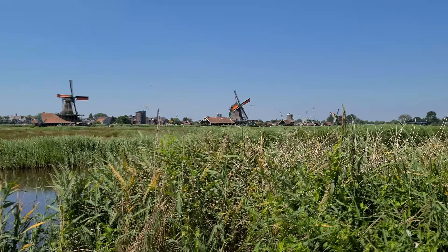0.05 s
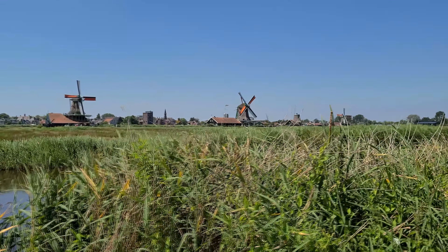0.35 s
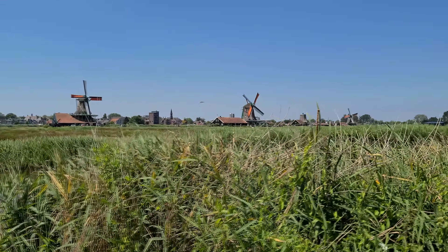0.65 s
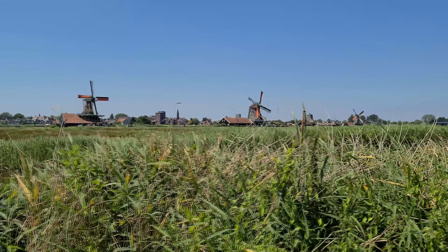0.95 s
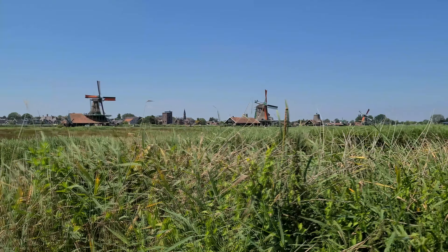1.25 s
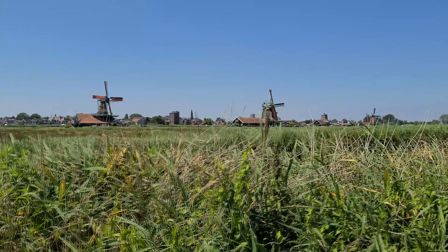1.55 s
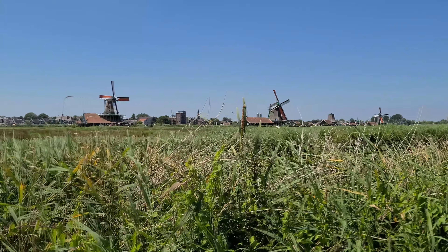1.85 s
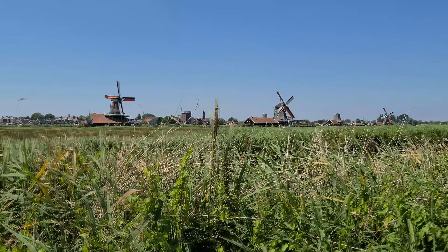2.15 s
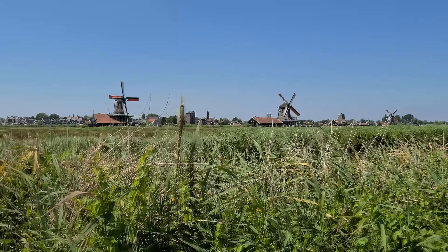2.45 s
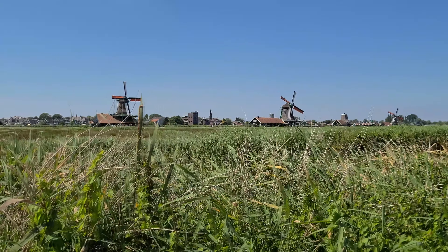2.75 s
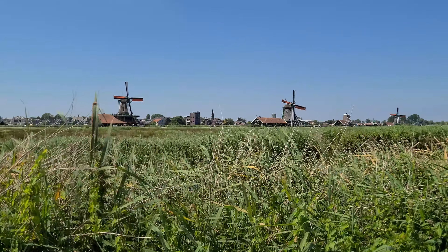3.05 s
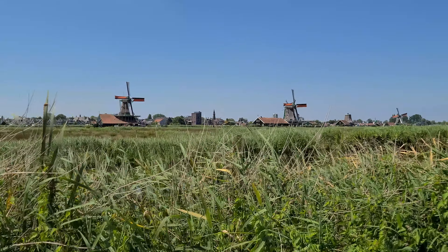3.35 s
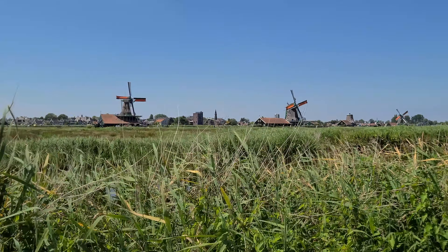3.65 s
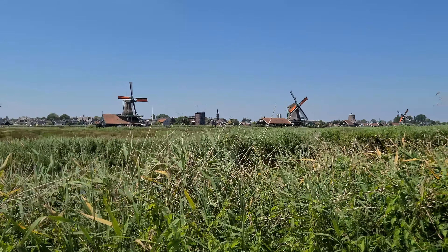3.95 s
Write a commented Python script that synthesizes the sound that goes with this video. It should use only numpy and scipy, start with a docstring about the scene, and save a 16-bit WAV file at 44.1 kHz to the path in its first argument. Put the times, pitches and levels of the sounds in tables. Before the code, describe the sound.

Wind rumbles and thumps on the microphone throughout, strongest at the start and near 1 and 2 seconds. Grass hisses softly underneath, and close reeds rustle, with small stalk snaps around 0.4, 1 to 1.3, 2.5 and 3.2 seconds. A distant bird repeats a faint whistle about four times a second with short gaps. A quiet songbird warbles on the right near 0.7, 1.3 and 2 seconds.

```python
"""Gusts rumble and thump on the microphone in a breezy reed meadow, over a soft, wide hiss of grass.
Close by, reeds swish, leaves brush, and stalks rub and snap: all grainy noise and short pulses.
Far off to the left, a wading bird repeats an arched whistle about four times a second, and a small
songbird on the right answers with warbled notes. Faint yelps of water birds and the blurred
whistles of a flock sit at the back, in the weak echo of open land."""
import sys
import numpy as np
from scipy import signal
from scipy.fft import rfft, irfft
from scipy.io import wavfile
from scipy.ndimage import uniform_filter1d, map_coordinates

SR = 44100
rng = np.random.default_rng(int(sys.argv[2]) if len(sys.argv) > 2 else 0)


def wav_out(sig):
    """Save sig, one row per channel (or a flat mono array), as 16-bit PCM at SR to the path in sys.argv[1]."""
    wavfile.write(sys.argv[1], SR, np.round(np.clip(np.atleast_2d(sig).T, -1, 1) * 32767).astype(np.int16))


N = 176400
T = np.arange(N) / SR

# gust envelopes, before the trim (time [s], rumble [dB], buffeting [dB], flutter [dB])
GUSTS = [(0.0, -32.5, -30, -45), (0.02, -45.5, -33.5, -47), (0.27, -39, -47, -66.5), (0.3, -53.5, -53, -64),
         (0.39, -44.5, -52, -68), (0.75, -47.5, -48.5, -60), (0.99, -42.5, -39, -57),
         (1.1, -46, -53, -54.5), (1.17, -50, -42.5, -67.5), (1.26, -42, -43.5, -54.5),
         (1.43, -41, -42, -53), (1.76, -40, -42, -61), (1.82, -43.5, -51.5, -60), (1.95, -35.5, -44.5, -69),
         (2.03, -40.5, -45.5, -62.5), (2.56, -42, -50.5, -68.5), (2.95, -47.5, -51, -66.5),
         (3.05, -45, -47, -67), (3.11, -42, -49, -57.5), (3.14, -42.5, -46, -61), (3.61, -47.5, -51, -70.5),
         (3.68, -43, -53, -73), (3.71, -47, -56, -63.5), (4.0, -46, -53.5, -70)]
# tone of the low, middle and upper wind layers (frequency [Hz], relative level [dB])
RUMBLE_EQ = [(12,-35),(24,-8.5),(40,1),(58,3.5),(85,2.5),(110,-6),(150,-23),(260,-62.5)]
BUFFET_EQ = [(65,-31),(105,-7),(130,-0.5),(165,-1),(205,-7.5),(260,-15.5),(340,-32.5),(600,-67.5)]
FLUTTER_EQ = [(170,-15),(250,-2.5),(310,0.5),(450,-5),(600,-11.5),(900,-29),(1600,-35),(4000,-53)]
# eddies thumping the microphone (time [s], pitch [Hz], half width [s], peak [dB])
EDDY_THUMPS = [(0.039,180.7,0.031,-29),(0.153,115.7,0.013,-25),(0.387,42.17,0.057,-35.5),(0.503,62.3,0.022,-33.5),(0.646,54.6,0.014,-32.5),(0.983,154.2,0.0071,-24),(1.036,215.2,0.018,-35.5),(1.135,37.95,0.032,-32.5),(1.371,98.6,0.01,-29),(1.745,133.6,0.012,-27),(1.959,76.2,0.0084,-23),(2.317,88,0.014,-30),(2.535,57.56,0.024,-30.5),(2.791,42.4,0.034,-39),(3.102,156.3,0.021,-33),(3.67,66,0.014,-28.5)]

# stalks snapping (time [s], snap peak [dB], centre [Hz], crunch [dB], crunch decay [s], L-R [dB])
STALK_SNAPS = [(0.352,-46,1390,-55,0.005,-1),(1.039,-41,1190,-50.5,0.025,-4),(1.0725,-49,2180,-57,0.014,-5),(1.2349,-43,1830,-50.5,0.0066,2),(1.263,-57,890,-55.5,0.016,-9),(2.206,-54,2100,-58,0.0066,20),(2.4806,-52,1090,-51,0.0049,-4),(2.5553,-44.5,2600,-64,.002,2),(2.6023,-50,2100,-53,.003,-5),(2.642,-59,900,-62,.003,2),(3.133,-50,1300,-57,.003,2),(3.1998,-48,2570,-62,.002,-2),(3.76,-53,1290,-57,.004,-2)]
# tone of a crunching or rubbing stalk (frequency [multiple of the centre], relative level [dB])
STALK_EQ = [(.2,6),(.55,3.5),(1,4),(1.6,-0.5),(2.6,-23),(6,-26)]
# stalks rubbing (time [s], half width [s], level [dB], centre [Hz], L-R [dB])
STALK_RUBS = [(0.38,.028,-59,1340,0),(0.528,0.023,-59.5,1260,2),(0.818,0.05,-64,980,-7),(1.509,0.017,-59.5,1230,-1),(1.665,0.011,-63.5,1400,2),(1.787,0.025,-58.5,1400,-1),(3.395,.012,-59,1620,-5),(3.927,0.0076,-60.5,1700,1)]

# wader calls (time [s], length [s], gain of the rise [dB], of the top [dB], of the fall [dB])
WADER_CALLS = [(0.085,0.14,-59,-69,-58.5),(0.332,0.14,-60.5,-66,-61),(0.574,0.12,-57.5,-72,-61),(.797,0.17,-58,-62.5,-60.5),(1.29,.13,-70,-83,-81),(1.521,0.13,-58.5,-80,-65),(1.776,0.12,-72,-73,-71),(2.012,.125,-68,-77,-75),(2.252,0.14,-64,-69,-61.5),(2.504,0.12,-60,-82,-66),(2.94,.135,-59,-79,-65),(3.175,0.17,-65,-72,-67),(3.41,0.14,-65,-68,-61.5),(3.658,.138,-57,-69,-62),(3.906,0.12,-62,-70,-68)]
# contour of one call (position [share of its length], pitch [Hz], relative level [dB])
CALL_ARCH = [(0,2642,-10),(.05,2851,0.5),(.11,3193,4.5),(.17,3414,-2.5),(.21,3776,-3),(.27,3970,-2),(.38,3920,-5.5),(.49,3692,-5),(.53,3410,-10),(.58,3170,2),(.65,2988,6.5),(.71,2816,0.5),(.8,2636,-2.5),(.94,2516,-5.5),(1,2430,-13)]
# songbird notes (time [s], length [s], start pitch [Hz], end pitch [Hz], flick rate [1/s],
# flick height before it shrinks [Hz], level [dB])
SONG_NOTES = [(.657,.08,4750,4880,46,400,-72),(.755,0.071,4040,3920,115,300,-75),(1.284,.013,4550,4500,44,100,-72),(1.299,0.1,4660,4970,45,750,-62.5),(1.405,0.037,4030,3990,150,556,-65),(1.443,0.048,3860,3890,120,120,-69),(2.005,0.098,4760,4920,44,405,-75),(2.091,0.097,4020,3900,116,300,-71.5)]

# swish envelope of the near reeds, before the trim (time [s], level [dB])
REED_SWELLS = [(0.0, -79), (0.01, -72.5), (0.42, -73), (0.49, -73), (0.56, -75.5), (0.7, -72.5),
               (0.89, -78.5), (1.2, -70), (1.41, -84.5), (1.83, -72.5), (1.95, -76.5), (2.34, -72),
               (3.03, -75), (3.05, -67), (3.16, -79), (3.2, -69), (3.23, -76), (3.39, -76), (3.43, -71),
               (3.72, -73.5), (3.91, -71), (4.0, -75.5)]
# leaves brushing (time [s], half width [s], level [dB], L-R [dB])
LEAF_BRUSHES = [(0.482,.018,-69.5,1),(.675,0.017,-72,0),(1.172,0.053,-69,-6),(1.701,0.0069,-70,0),(3.06,0.016,-71,4),(3.188,0.005,-62.5,3),(3.2,.0004,-50,-3),(3.209,0.007,-66,0),(3.487,.007,-67,9),(3.845,0.027,-72,-7),(3.918,0.0017,-62,-10)]
# tone of reeds, leaves, distant grass and dry stems (frequency [Hz], relative level [dB])
REED_EQ = [(1500,-23),(3500,-22),(6000,8.5),(7200,7),(7900,-3),(9300,3),(10500,0.5),(12000,4.5),(14000,-0.5),(16000,-1.5)]
LEAF_EQ = [(3000,-7),(6600,0.5),(7900,-3),(9300,6),(12500,7.5),(16000,-4.5)]
GRASS_EQ = [(200,5.5),(500,1),(800,-6),(1250,3),(1600,-7),(2100,-1.5),(2800,0.5),(4000,-2),(5200,-1.5),(6300,-9.5),(7200,-14),(7900,-34),(9500,-31),(12000,-18.5),(16000,-17)]
STEM_EQ = [(250, -15), (700, 0.5), (1300, -2), (2600, -4.5), (5000, -11.5), (8000, -29)]

# distant water birds (time [s], half width [s], pitch [Hz], dry peak [dB])
FAR_YELPS = [(0.883,.022,1533,-62),(1.417,0.0099,1198,-60.5),(2.109,0.017,1520,-64),(2.358,.016,1350,-75),(2.236,0.009,2777,-56),(3.187,0.025,1404,-63)]


def wind(trim_db=1):
    """Rumble, buffeting and flutter ride the gusts; single eddies thump through."""
    times, *envelopes = np.array(GUSTS).T
    rumble, buffet, flutter = (undb(np.interp(T, times, db) + trim_db) for db in envelopes)
    out = turbulence(RUMBLE_EQ, side_db=-9.5, flicker_db=3) * rumble
    out += turbulence(BUFFET_EQ, side_db=-6.5, flicker_db=2) * buffet
    out += turbulence(FLUTTER_EQ, side_db=-6.5, flicker_db=3) * flutter
    wobbly_time = np.cumsum(1 + 0.1117 * drift(90)) / SR
    for at, hz, half, db in EDDY_THUMPS:
        phase = rng.random() + 0.067 * rng.standard_normal((2, 1))  # each port meets the eddy its own way
        out += undb(db) * swell(at, half) * np.sin(2 * np.pi * (hz * wobbly_time + phase))
    return out * pan(0.9)


def turbulence(eq, side_db, flicker_db):
    """Pressure noise on the microphone's two ports, levelled and then given a fast flicker."""
    noise = colour(rng.standard_normal((2, N)), eq)
    mid, side = noise / np.sqrt(uniform_filter1d(noise ** 2, size=5000, axis=1))
    return unit(widen(mid, side, side_db) * undb(flicker_db * drift(35)))


def stalk_snaps():
    """Each stalk snaps with one sharp pulse, then gives a short, dull crunch."""
    out, t = np.zeros((2, N + SR)), T[:8192]
    noise = stereo_noise(side_db=-7)
    for at, snap_db, hz, crunch_db, decay, lr in STALK_SNAPS:
        i = int(at * SR)
        band = signal.butter(2, [0.74 * hz, 1.56 * hz], 'band', fs=SR, output='sos')
        snap = signal.sosfilt(band, 1. * (t == 0))
        snap *= undb(snap_db) / np.abs(snap).max()
        crunch = stalk_tone(np.roll(noise, -i, axis=1)[:, :len(t)], hz)
        envelope = np.exp(-t / decay) * (1 - np.exp(-t * hz))
        out[:, i:i + len(t)] += pan(lr) * (snap + undb(crunch_db) * crunch * envelope)
    return out[:, :N]


def stalk_rubs():
    """Stalks rub together in brief swells of dull grains."""
    grains = stereo_noise(side_db=-13) * grain(depth_db=2.5, samples=90)
    return sum(stalk_tone(grains, hz) * undb(db) * pan(lr) * swell(at, half)
               for at, half, db, hz, lr in STALK_RUBS)


def wader(right_lag_s=0.00049):
    """A whistle leaps, thins at the top and falls; it reaches the left port first."""
    out = np.zeros(N + SR)
    share, arch_hz, arch_db = np.array(CALL_ARCH).T
    waver = 1 + 0.008 * drift(200) + 0.0082 * drift(20)
    for at, length, rise_db, top_db, fall_db in WADER_CALLS:
        u, i = np.linspace(0, 1, int(length * SR)), int(at * SR)
        pitch = np.interp(u, share, arch_hz) * np.roll(waver, -i)[:len(u)]
        effort_db = np.interp(u, [.17, .22, .49, .56], [rise_db, top_db, top_db, fall_db])
        fades = np.clip(np.minimum(u, 1 - u) / 0.0081, 0, 1)
        envelope = undb(effort_db + np.interp(u, share, arch_db)) * fades
        out[i:i + len(u)] += np.sqrt(2) * envelope * sine(pitch)
    flicker = undb(2.8 * drift(110))  # moving air shakes the level
    left, right = outdoors(out[None, :N] * flicker, wet_db=-11, t60=0.35)
    return np.array([left, np.interp(T - right_lag_s, T, right)]) * pan(1.5)


def songbird(flick_dip_db=-18.5, flick_shrink=0.49):
    """A high trill, then a lower, sagging buzz; the voice thins at each upward flick of pitch."""
    out = np.zeros(N + SR)
    waver, flicker = 1 + 0.0062 * drift(300), undb(1.5 * drift(120))
    for at, length, start_hz, end_hz, rate, height, db in SONG_NOTES:
        u, i = np.linspace(0, 1, int(length * SR)), int(at * SR)
        cusps = (1 - np.abs(np.sin(np.pi * rate * u * length))) ** 1.55
        flick = cusps * (1 - flick_shrink * u)
        pitch = (start_hz + (end_hz - start_hz) * u + height * flick) * waver[i:i + len(u)]
        envelope = np.sqrt(2 * np.abs(np.sin(np.pi * u)))
        out[i:i + len(u)] += undb(db + flick_dip_db * np.sqrt(flick)) * envelope * sine(pitch)
    return outdoors(out[:N] * flicker * pan(-21.5), wet_db=-13, t60=0.17)


def reeds(swish_trim_db=3.5):
    """Near reeds swish as a mass of tiny grains; single leaves brush past each other."""
    texture = grain(depth_db=1.85, samples=20)
    swish = colour(stereo_noise(side_db=1.5) * texture, REED_EQ)
    swish *= undb(np.interp(T, *np.array(REED_SWELLS).T) + swish_trim_db)
    crinkle = grain(depth_db=2, samples=30)
    leaves = colour(stereo_noise(side_db=-6.5) * crinkle, LEAF_EQ)
    touches = sum(undb(db) * pan(lr) * swell(at, half) for at, half, db, lr in LEAF_BRUSHES)
    return swish * pan(4.5) + leaves * touches


def grass(hiss_db=-61.5, crackle_db=-68.5):
    """A wide bed of distant grass hiss, with a light, uneven crackle of dry stems."""
    hiss = colour(stereo_noise(side_db=0.5), GRASS_EQ) * undb(hiss_db + 0.5 * drift(7.22))
    grains = stereo_noise(side_db=-5) * undb(14 * np.repeat(rng.random(N // 60) ** 6, 60))
    crackle = colour(grains, STEM_EQ) * undb(crackle_db + 4.3 * np.tanh(drift(14)))
    return hiss + crackle


def yelps(sag_hz_per_s=2500):
    """Water birds give short, hoarse, sagging notes from far across the meadow."""
    out, hoarse = np.zeros(N), 1 + 0.13 * drift(500)
    for at, half, hz, db in FAR_YELPS:
        pitch = (hz - sag_hz_per_s * (T - at)) * hoarse
        out += undb(db) * swell(at, half) * sine(pitch)
    return outdoors(np.array([out, out]), wet_db=-2.5, t60=0.44)


def flock(count=240, level_db=-76, centre_hz=2950, half_width_s=0.008):
    """Many far birds give short, gliding whistles at random, which blur in the open air."""
    out, t = np.zeros((2, N + SR)), T[:SR // 5] - 0.1
    envelope = np.exp(-(t / half_width_s) ** 2)
    for when, height, glide, size, place in rng.random((count, 5)):
        pitch = centre_hz * np.exp(0.14 * (2 * height - 1) + 6 * (2 * glide - 1) * t)
        stereo_phase = np.pi * np.array([[place], [-place]])
        i = int(when * N)
        out[:, i:i + len(t)] += (0.5 + size) * envelope * sine(pitch, stereo_phase)
    return unit(outdoors(out[:, :N], wet_db=2, t60=0.32)) * undb(level_db)


def outdoors(x, wet_db, t60):
    """Add the weak, diffuse echo of open land, dying by 60 dB in t60 seconds."""
    t = T[:SR // 2]
    tail = rng.standard_normal((2, len(t))) * undb(-60 * t / t60) * (1 - np.exp(-t / 0.0025))
    tail /= np.sqrt(np.sum(tail ** 2, axis=1, keepdims=True))
    return x + undb(wet_db) * signal.fftconvolve(x.mean(0)[None], tail, axes=1)[:, :N]


def undb(db):
    """Decibels to gain."""
    return 10 ** (np.asarray(db) / 20)


def unit(x):
    """Scale to rms 1."""
    return x / np.sqrt(np.mean(x ** 2))


def pan(db):
    """Left and right gains, db apart; positive is left."""
    return undb(np.array([[db], [-db]]) / 2)


def colour(x, eq):
    """Shape a sound with an EQ curve of (Hz, dB) points, at rms 1."""
    hz, db = np.array(eq, float).T
    f = np.maximum(np.fft.rfftfreq(x.shape[-1], 1 / SR), 1)
    gain = undb(np.interp(np.log(f), np.log(hz), db))
    return unit(irfft(rfft(x) * gain, x.shape[-1]))


def stalk_tone(x, centre_hz):
    """The dull colour of a stalk, tuned to centre_hz."""
    return colour(x, [(centre_hz * ratio, db) for ratio, db in STALK_EQ])


def drift(rate):
    """Smooth random motion through rate points a second, with a spread near 1."""
    return map_coordinates(rng.standard_normal(1024), [T * rate + 4], order=2, mode='wrap')


def grain(depth_db, samples):
    """A gain that jumps at random every few samples, to roughen noise."""
    return undb(depth_db * np.repeat(rng.exponential(size=N // samples), samples))


def swell(at, half):
    """Bell-shaped envelope, down to 1/e at half seconds either side of its peak."""
    return np.exp(-((T - at) / half) ** 2)


def sine(hz, phase=0):
    """A pure tone that follows a pitch curve."""
    return np.sin(2 * np.pi * np.cumsum(hz) / SR + phase)


def widen(mid, side, side_db):
    """Mid and side to left and right."""
    return mid + undb(side_db) * side * np.array([[1], [-1]])


def stereo_noise(side_db):
    """White noise that widens as side_db rises."""
    return widen(*rng.standard_normal((2, N)), side_db)


def scene():
    """Mix wind, plants and birds."""
    breeze = wind() + grass() + reeds() + stalk_snaps() + stalk_rubs()
    return breeze + wader() + songbird() + yelps() + flock()


def record(dry):
    """A steep low-pass takes off the very top."""
    return signal.sosfilt(signal.ellip(10, 0.1, 70, 15750, fs=SR, output='sos'), dry)


dry = scene()
out = record(dry)
wav_out(out)
```